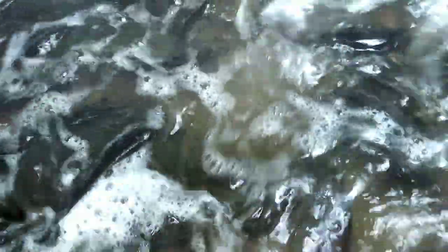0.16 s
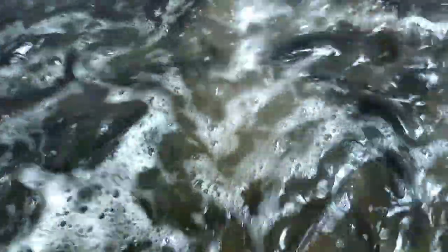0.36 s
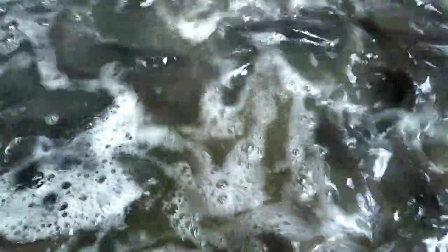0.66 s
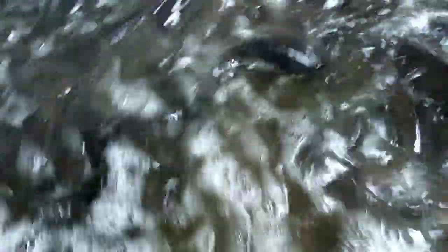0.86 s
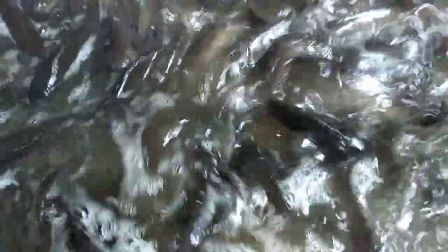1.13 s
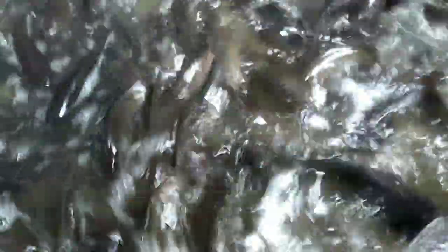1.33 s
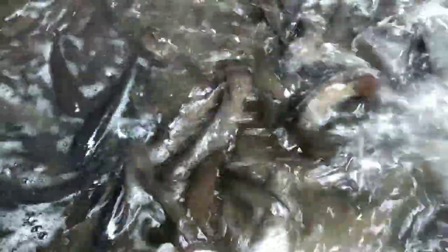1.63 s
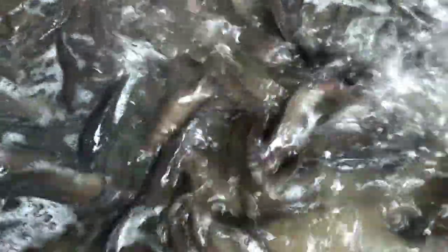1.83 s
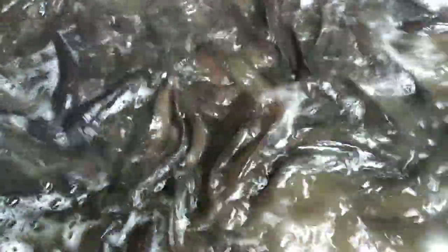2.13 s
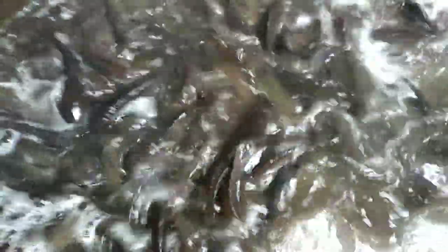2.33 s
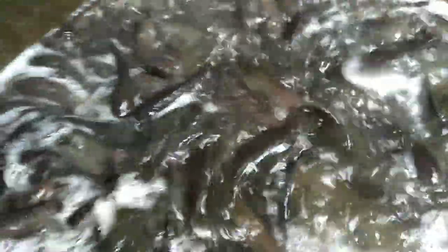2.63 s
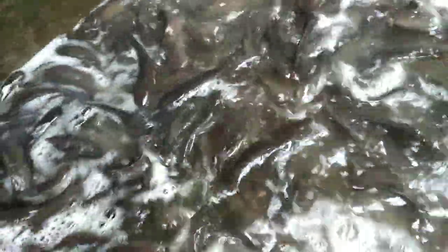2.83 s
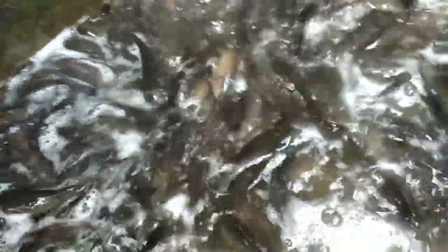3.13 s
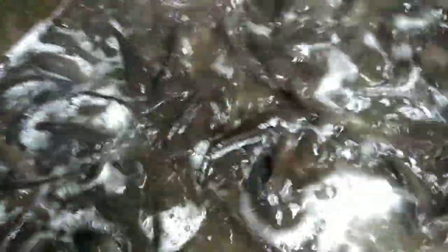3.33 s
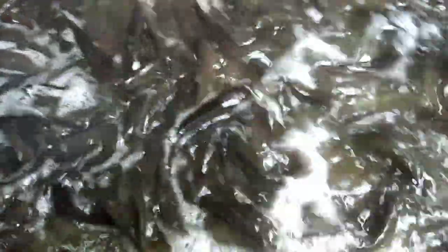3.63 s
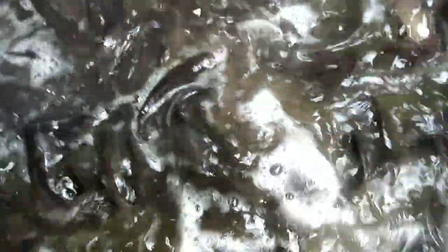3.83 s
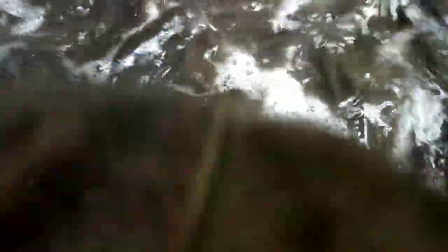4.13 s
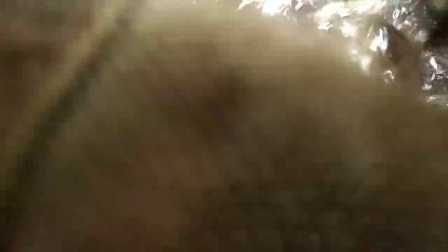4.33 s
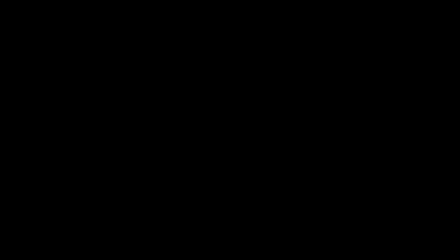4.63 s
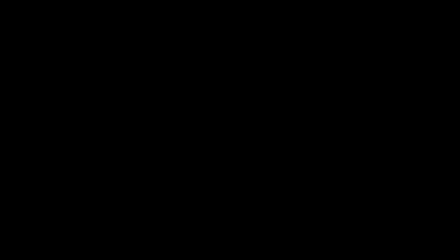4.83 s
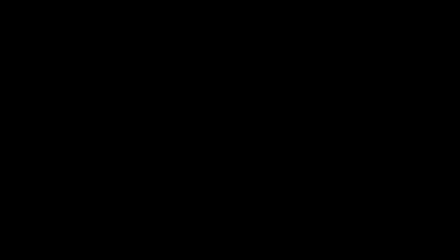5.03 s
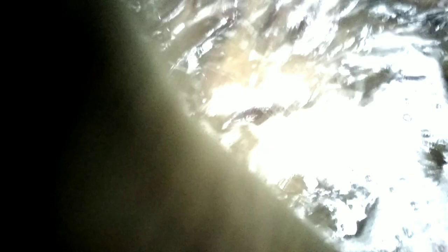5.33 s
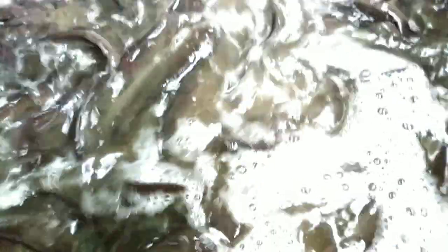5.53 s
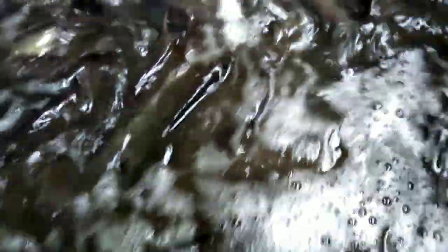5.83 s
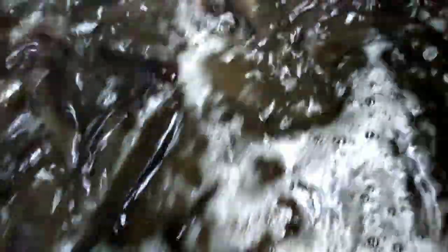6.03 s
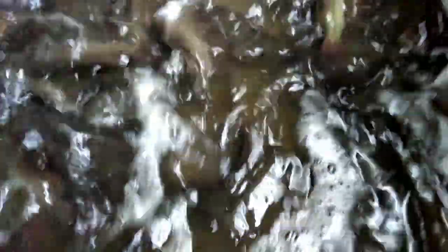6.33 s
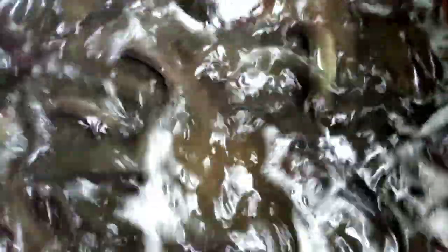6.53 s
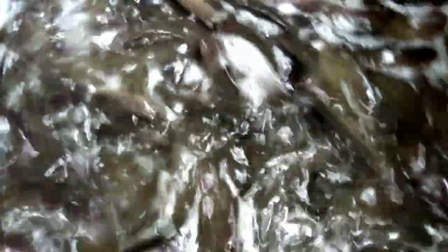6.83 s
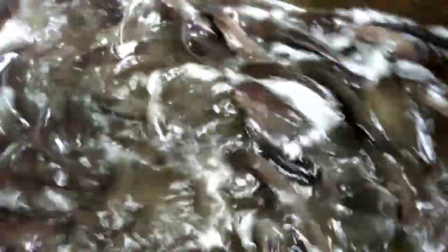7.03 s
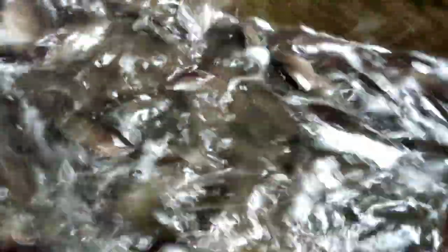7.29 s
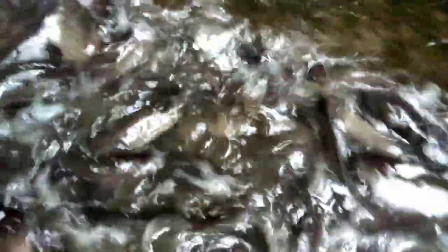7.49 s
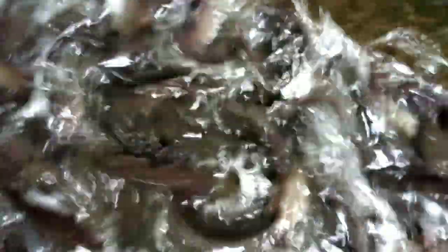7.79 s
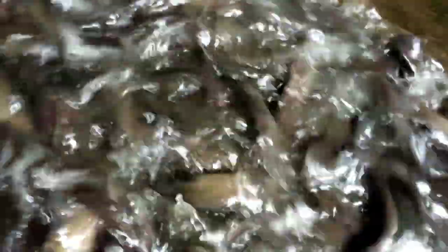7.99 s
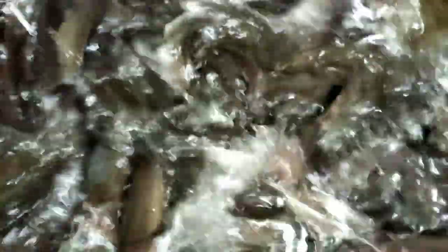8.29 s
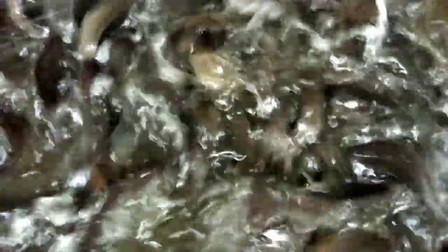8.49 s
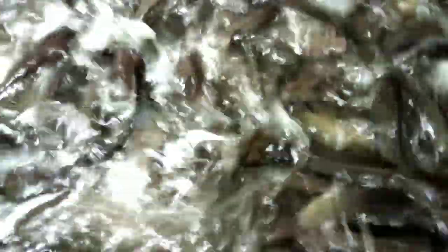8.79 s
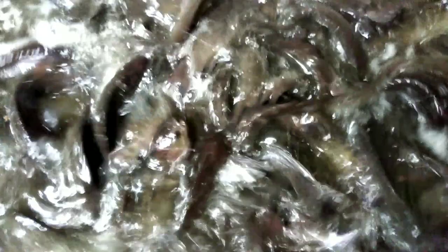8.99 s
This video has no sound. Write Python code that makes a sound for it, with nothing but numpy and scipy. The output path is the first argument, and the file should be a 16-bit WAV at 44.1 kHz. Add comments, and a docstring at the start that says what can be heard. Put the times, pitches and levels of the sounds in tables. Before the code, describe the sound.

Crowded fish thrash at a water surface, with close splashes, bubbly plops and slaps, a brief hand bump, then a dense churning rush of water.

```python
"""At the surface of a tank, crowded fish thrash close to two hand-held microphones.
Tail slaps throw hissing spray (shaped noise) and trap air that rings as rising bubbles (swept sines).
Swarms of small bubbles make the churning, smacks are short pips, and body blows are low noise puffs.
Late on the whole shoal churns into one rush. Tank walls scatter the sound by sparse echoes.
A low noise rumble lies beneath, and a hand brushes and ticks on the microphones for a second."""
import sys
import numpy as np
from scipy import signal
from scipy.fft import rfft, irfft, next_fast_len
from scipy.io import wavfile
from scipy.ndimage import uniform_filter1d

SR = 44100
rng = np.random.default_rng(int(sys.argv[2]) if len(sys.argv) > 2 else 0)


def waveform_to_disk(signal):
    """Save audio, clipped to [-1, 1], as 16-bit WAV at the path in sys.argv[1]."""
    frames = np.transpose(np.atleast_2d(signal))
    scaled = np.clip(frames, -1, 1) * 32767
    samples = np.round(scaled).astype(np.int16)
    wavfile.write(sys.argv[1], SR, samples)


N = 403515  # samples


def amp(db):
    """Decibel law: level to amplitude ratio; a doubled level gives the power ratio."""
    return 10 ** (np.asarray(db) / 20)


def evened(x):
    """Normalisation to unit root-mean-square."""
    return x / np.sqrt(np.mean(x ** 2) + 1e-20)


def read(points, hz):
    """Interpolation of a spectrum along a logarithmic frequency axis."""
    f, value = np.transpose(points)
    return np.interp(np.log(hz + 1), np.log(f + 1), value)


def sides(pan_db):
    """Level difference between the microphones: two gains of mean power 1, positive to the left."""
    share = 1 / (1 + amp(-2 * np.asarray(pan_db)))
    return np.sqrt(2 * np.array([share, 1 - share]))


def add(mix, s, sound):
    """Superposition: a sound joins the mix at its start time."""
    part = mix[..., max(round(s * SR), 0):][..., :sound.shape[-1]]
    part += sound[..., :part.shape[-1]]


def highpass(x, hz):
    """Second-order removal of the bass."""
    return signal.sosfilt(signal.butter(2, hz, "high", fs=SR, output="sos"), x)


def hiss(spectrum, patchy_db, same):
    """Coloured noise: random short-time spectra with small drifting patches and a set coherence."""
    frames, hz = N // 256 + 5, np.fft.rfftfreq(1024, 1 / SR)
    a, b, c, d, patches = rng.standard_normal((frames, 513, 5)).T
    patches = uniform_filter1d(patches, size=9, axis=0)
    patches = evened(uniform_filter1d(patches, size=4, axis=1))
    same, left = np.clip(same, 0, 1), a + 1j * b
    right = same * left + np.sqrt(1 - same ** 2) * (c + 1j * d)
    z = np.array([left, right])
    z *= amp(read(spectrum, hz)[:, None] + patchy_db * patches)
    return evened(signal.istft(z, nperseg=1024, noverlap=768)[1][:, :N])


def bubble(hz, length, lead=0., rise=4.3, start=0.043):
    """Bubble resonance: trapped air rings, and its pitch climbs as it nears the surface."""
    # length and lead in s, rise as a fraction of hz per s, start as a fraction of length
    t = np.arange(0, 2 * length, 1 / SR)
    swell = (1 - np.exp(-t / (start * length))) ** 2
    shape = swell * np.exp(-(t / (0.98 * length)) ** 2)
    t = t + np.array([[lead / 2], [-lead / 2]]) - length / 2
    return shape / shape.max() * np.sqrt(2) * np.sin(2 * np.pi * hz * (t + rise * t ** 2 / 2))


def swarm(pitches, lean_db, calm, cycles, per_s, spread_db, clump_db):
    """Random superposition: small bubbles from many directions, neighbouring sizes in clumps."""
    # lean_db per octave favours small or large bubbles
    out, clumps = np.zeros((2, N)), rng.standard_normal((N // 256 + 2, len(pitches))).T
    clumps = uniform_filter1d(clumps, size=8, axis=0) ** 2
    clumps = signal.lfilter([1], [1, -.8], clumps)  # sudden start, slower fade
    clumps = evened(np.log(clumps) - np.log(clumps).mean())
    for (hz, db), clump in zip(pitches, clumps):
        at = np.flatnonzero(rng.random(N - 100) < per_s / len(pitches) / SR) + 50
        big, way = rng.random((N // 50, 2))[:len(at)].T
        chance_db = spread_db * np.minimum(-np.log(1 - big), 4) + clump_db * clump[at // 256]
        octaves = np.log2(hz / 1600)
        size = amp(db + calm[at] * chance_db + lean_db[at] * octaves + 10.0 * (1 - calm[at]))
        lead = np.round(min(.0007, hz / 2700000.0) * (way - .5) * SR).astype(int)
        train = np.zeros((2, N))
        train[[[0], [1]], [at - lead, at + lead]] = size * sides(6 * (way - .5))
        out += signal.oaconvolve(train, bubble(hz, cycles / hz, rise=hz / 150), axes=1)[:, :N]
    return evened(out)


# How hard the shoal churns: time_s, gurgle_db, common_pitch_hz (sets the lean to small or large),
# gulps_db (deep, against the gurgle), fizz_db
CHURNING = [(0.0, -23, 1230, -9, -24.5), (0.06, -34, 1510, -24, -37.5), (0.43, -36, 2300, -19, -37),
            (0.48, -32, 1730, -18, -42.5), (1.76, -33, 1670, -30, -33.5), (2.11, -37.5, 1800, -22, -47.5),
            (2.34, -36.5, 1930, -17, -48), (2.66, -42, 1910, -19.5, -46.5), (3.56, -36.5, 1550, -30, -44.5),
            (4.25, -31, 2100, -32, -38), (4.36, -37.5, 1740, -37, -40.5), (6.2, -43.5, 2110, -28, -50),
            (6.34, -38.5, 2230, -11, -40), (6.39, -22, 1280, -39, -41.5), (6.445, -34, 1100, -16, -37.5),
            (6.5, -24, 1160, -22, -29), (6.6, -22, 1390, -5, -30.5), (7.24, -26, 1680, -13.5, -25.5),
            (7.77, -22.5, 1590, -15.5, -24.5), (8.71, -25, 1910, -17.5, -23.5),
            (9.05, -27.5, 1640, -19, -32), (9.15, -35.5, 2100, -21, -36.5)]
# Gurgle bubbles by size: pitch_hz, level_db
GURGLE_SIZES = [(430, -27.5), (700, -6.5), (1300, 4), (2000, 10), (2800, 5.5), (4200, 2)]
# Spectrum of fine spray: frequency_hz, level_db
MIST_SPECTRUM = [(2500, -24), (4600, -10.5), (6000, -7.5), (7500, -1.5), (9700, -3.5), (12000, -7.5),
                 (14500, -13), (16000, -14)]


def shoal():
    """Summed bubble resonance: the common churning of gurgle, gulps, pattering drops and fizz."""
    t = np.arange(N) / SR
    s, *columns = np.transpose(CHURNING)
    gurgle_db, common_hz, gulp_db, fizz_db = (np.interp(t, s, c) for c in columns)
    calm = np.clip((-13.5 - fizz_db) / 26, .62, 1)  # chance evens out when all fish beat at once
    surge = uniform_filter1d(rng.standard_normal(N), size=1200)
    surge = evened(uniform_filter1d(surge, size=1200)) * calm ** 3

    hz = np.geomspace(430, 4400, num=60)
    lean_db = 12.8 * np.log2(common_hz / 1700)
    gurgle = swarm(list(zip(hz, read(GURGLE_SIZES, hz))), lean_db, calm,
                   cycles=10.86, per_s=1600, spread_db=2.5, clump_db=5.0)
    hz = np.geomspace(240, 620, num=16)
    gulps = swarm(list(zip(hz, 13.0 * np.log2(hz / 700))), np.zeros(N), calm,
                  cycles=4.66, per_s=390, spread_db=6.0, clump_db=1.5)

    spray = hiss(MIST_SPECTRUM, patchy_db=4.0, same=0) + amp(-3.0) * patter(calm)
    hz = np.geomspace(4600, 15000, num=16)
    fizz = swarm(list(zip(hz, read(MIST_SPECTRUM, hz))), np.zeros(N), calm,
                 cycles=5.8, per_s=1400, spread_db=6.5, clump_db=-3.0)
    spray += amp(-3.5) * fizz
    churn = np.sqrt(amp(2 * gurgle_db) + wakes()) * (gurgle + amp(gulp_db) * gulps)
    return churn + amp(fizz_db + 3.6 * surge) * spray


# Spectrum of drops: frequency_hz, level_db
DROP_SPECTRUM = [(500, -48), (1500, -7.5), (2500, -5), (4000, -5.5), (4800, -12.5), (7000, -10)]


def patter(calm):
    """Drop impact as brief resonance: falling drops make dense tiny plinks."""
    hz = np.geomspace(900, 6500, num=24)
    return swarm(list(zip(hz, read(DROP_SPECTRUM, hz))), np.full(N, 6.), calm,
                 cycles=11.94, per_s=4000, spread_db=2.5, clump_db=3.0)


# Loud bubbles: start_s, pitch_hz, level_db, length_ms, left_right_db
LOUD_BUBBLES = [(0.003, 496, -31.5, 42, -6), (0.129, 617, -31, 11.4, 6), (0.138, 1390, -30.5, 30, 5),
                (0.203, 615, -30.5, 17, -3), (0.282, 525, -27, 26, -4), (0.296, 2080, -28.5, 40, 3),
                (0.316, 661, -26.5, 46, 2), (0.397, 706, -33, 18.5, -2), (0.503, 1450, -21.5, 17.6, 9),
                (0.593, 1460, -27, 17.4, 6), (0.663, 1690, -18.5, 14.4, -8), (0.677, 485, -29, 11.5, 2),
                (0.694, 1947, -24, 30, 5), (0.766, 2260, -22, 8.6, 5), (0.821, 1020, -23.5, 23.5, 10),
                (0.901, 604, -21.5, 11.2, 1), (0.951, 343, -25, 26, 3), (1.056, 1317, -18, 8.8, 3),
                (1.319, 980, -31, 8.4, 2), (1.342, 1192, -30, 26, 5), (1.444, 1730, -19.5, 9.5, 1),
                (1.637, 985, -32, 39, 8), (1.7, 615, -27.5, 13.8, 7), (1.805, 2266, -29, 24, 17),
                (1.808, 1060, -29, 26, 4), (2.172, 1057, -35, 23, 4), (2.255, 1306, -35.5, 21, 10),
                (2.356, 1330, -28, 14, 11), (2.438, 595, -29.5, 10.2, 11), (2.529, 940, -34, 26, -3),
                (2.69, 2140, -32.5, 10.6, 3), (3.06, 928, -27, 22, -2), (3.071, 2000, -24, 17, -6),
                (3.074, 2420, -25, 10, 15), (3.211, 1210, -21, 7, 3), (3.283, 990, -33, 17, 11),
                (3.645, 610, -32, 33, -22), (3.738, 1427, -20.5, 23, -14), (3.84, 534, -32.5, 25, 12),
                (4.102, 1530, -24.5, 29, -9), (4.271, 2080, -33, 6.4, 24), (4.329, 1840, -26, 13, 8),
                (4.436, 1354, -31.5, 15, 3), (4.538, 1990, -22.5, 8.2, 13), (4.626, 885, -24.5, 12, 16),
                (4.651, 1935, -18, 16.6, -12), (4.79, 1890, -23, 6.9, 32), (4.914, 2940, -29, 12, 3),
                (5.245, 2114, -26, 11, 20), (5.425, 1780, -23.5, 15.4, 26), (5.567, 1820, -28, 10, 47),
                (5.636, 1720, -34, 8, 4), (5.722, 620, -36, 27.5, -2), (5.785, 1834, -30, 14, 28),
                (5.925, 935, -36, 10, 2), (6.126, 1150, -36.5, 13, 5), (6.143, 1480, -31.5, 13, 20),
                (6.396, 1173, -20, 11.8, 0), (6.478, 420, -29, 24, 1), (6.506, 784, -22.5, 12, 6),
                (6.533, 1430, -24, 12, 4), (6.565, 1260, -19, 8.2, 5), (6.622, 686, -19.5, 14.5, 1),
                (6.743, 980, -17, 8.8, -4), (7.224, 561, -25, 25, -8.5), (7.414, 1223, -22, 16, 0.5),
                (8.121, 1190, -21.5, 20, -9.5), (8.381, 840, -18, 9, -9.5), (8.739, 1480, -28, 17.7, -8)]
# The surface snaps shut over each loud bubble: level against it, fading time
SNAP_DB, SNAP_S = 1.5, 0.00079


def bubbles():
    """Size and resonance: deep air pockets glide cleanly, small ones break into blips of nearby pitch."""
    out = np.zeros((2, N))
    for s, hz, db, ms, pan_db in LOUD_BUBBLES:
        side, deep = sides(pan_db)[:, None], min(950 / hz, 1)
        lead = -.00002 * pan_db  # the paths to the microphones differ
        ring = bubble(hz, ms / 1000, lead, rise=4.67 * deep ** 2)
        ragged = evened(uniform_filter1d(rng.standard_normal(8820), size=110))
        ragged = np.tanh(ragged)[:ring.shape[1]]
        add(out, s, amp(db) * ring * (1 + 2.3 * (1 - deep) * min(ms / 25, 1) * ragged) * side)

        snap = rng.standard_normal(600) * np.exp(-np.arange(600) / SR / SNAP_S)
        snap = signal.lfilter(*signal.butter(1, [hz / 2, hz * 2], "band", fs=SR), snap)
        add(out, s, amp(db + SNAP_DB) * snap * np.sqrt(4000 / hz) * side)

        for a, b, c in rng.random((8, 3)):
            small_hz = hz * np.exp(0.58 * (a - .45))
            blip = bubble(small_hz, (3.03 + 3.82 * c) / small_hz, 0.00064 * (c - .5))
            blip_db = db - 12.5 * b - 7.4 * deep  # later blips are weaker
            add(out, s + (0.017 + 1.2 * ms / 1000) * b, amp(blip_db) * blip * side)
    return out


# Drops and fin tips smack the surface: start_s, level_db, pitch_hz
SURFACE_SMACKS = [(0.297, -19, 2080), (0.396, -10, 2320), (0.507, -14, 1470), (0.668, -11, 1610),
                  (0.754, -17, 1260), (0.817, -25, 1010), (1.159, -15, 1130), (1.325, -32, 2500),
                  (1.445, -12, 2570), (1.546, -19.5, 2100), (1.597, -18, 2130), (1.627, -14, 2150),
                  (1.677, -13, 3500), (2.32, -21.5, 3300), (2.359, -25, 1460), (2.693, -19, 2190),
                  (3.087, -18, 1610), (3.163, -18.5, 1900), (3.278, -21.5, 1980), (3.789, -20, 1620),
                  (4.016, -17.5, 2470), (4.105, -17, 2100), (4.119, -15.5, 1510), (4.142, -20, 2240),
                  (4.273, -16, 1980), (4.369, -12.5, 3380), (4.527, -20, 2200), (4.677, -15.5, 1940),
                  (4.694, -21.5, 1210), (5.542, -17.5, 1860), (5.7, -17.5, 2120), (5.891, -17, 2080),
                  (5.924, -22, 2700), (8.764, -10.5, 1030)]
SMACK_CYCLES = 3.3  # the pip is strongest after half of these
SMACK_WAKE_DB, SMACK_LEFT_DB = -8, 13.5


def smacks():
    """Impact transient: a crisp pip of a few cycles, then small bubbles of nearby pitch pop."""
    out = np.zeros((2, N))
    draws = rng.random((len(SURFACE_SMACKS), 8, 3))
    for (s, db, hz), rows in zip(SURFACE_SMACKS, draws):
        turns = np.arange(600) / SR * hz
        shape = turns * np.exp(1 - turns) ** (2 / SMACK_CYCLES)
        pip = np.sin(2 * np.pi * turns * (1 + 0.012 * turns)) * shape
        add(out, s, amp(db) * pip / abs(pip).max() * sides(SMACK_LEFT_DB)[:, None])
        for a, b, c in rows:
            small_hz = hz * np.exp(0.44 * (a - .45))
            pop = bubble(small_hz, 7.33 / small_hz, 0.00059 * (c - .5))
            add(out, s + 0.035 * b, amp(db - 13.5 - 10.5 * b) * pop)
    return out


# Each loud bubble or smack stirs a wake: level against it, swell and fading times
WAKE_DB, WAKE_RISE_S, WAKE_FADE_S = -7.5, 0.0023, 0.024


def wakes():
    """Impulse response of stirred water: extra gurgle power swells quickly and fades slower."""
    s, db = np.transpose(LOUD_BUBBLES)[[0, 2]]
    kicks, t = np.zeros(N), np.arange(0, .4, 1 / SR)
    np.add.at(kicks, np.round(s * SR).astype(int), amp(2 * (db + WAKE_DB)))
    for at, smack_db in np.array(SURFACE_SMACKS)[:, :2]:
        kicks[round(at * SR)] += amp(2 * (smack_db + WAKE_DB + SMACK_WAKE_DB))
    shape = (1 - np.exp(-t / WAKE_RISE_S)) * np.exp(-t / WAKE_FADE_S)
    return abs(signal.oaconvolve(kicks, shape)[:N])


# Dull blows of a body on the water: start_s, level_db
BODY_SLAPS = [(1.154, -26.5), (1.831, -25.5), (2.437, -28), (3.006, -25.5), (3.652, -21.5), (3.992, -26),
              (6.484, -18), (6.62, -24), (8.028, -27.5), (8.76, -17.5)]
# Band of the thud: low_hz, high_hz
THUD_BAND = (200, 686)


def slaps():
    """Damped impact: a short low noise puff with a hard start, nearly alike at both microphones."""
    out, t = np.zeros((2, N)), np.arange(4000) / SR
    band = signal.butter(1, THUD_BAND, "band", fs=SR, output="sos")
    draws = rng.standard_normal((len(BODY_SLAPS), 3, 4000))
    for (s, db), noise in zip(BODY_SLAPS, draws):
        burst = (noise[0] + 0.093 * noise[1:]) * np.exp(-t / 0.018)  # fading time in s
        puff = signal.sosfilt(band, burst)
        add(out, s, amp(db) * puff / abs(puff).max())
    return out


# Sprays from tail slaps: top_s (strongest moment), level_db, width_ms,
# coarse_db (drops against fine mist), left_right_db
TAIL_SPRAYS = [(0.142, -28.5, 8.2, 3, -12), (0.328, -37.5, 67, 9.5, -2), (0.402, -23, 23, -10, -3),
               (0.447, -29.5, 22, -6, 2), (0.523, -27.5, 29, 6.5, 1), (0.701, -27, 89, 3, -3),
               (0.921, -23.5, 43, -5.5, -0.5), (1.022, -29, 46, -1, 2), (1.105, -34, 140, -4.5, 2.5),
               (1.248, -37.5, 26, 0, 18), (1.334, -24, 15, 1, -5), (1.508, -36, 130, 6.5, 2),
               (1.675, -35.5, 57, 10.5, 4), (1.912, -35, 40, 4, 1), (2.084, -35.5, 43, 3, -1.5),
               (2.214, -31, 17, -2, 5), (2.322, -18, 34, -11, 0), (2.411, -26.5, 60, 1, 1),
               (2.486, -35.5, 84, 1.5, -3), (2.72, -28.5, 31, -19, -1), (3.069, -25, 33, -6.5, -5),
               (3.204, -35.5, 98, 5, -5), (3.67, -31.5, 27, 2.5, 4), (3.855, -31.5, 19, 3, -11),
               (3.889, -29, 25, 5.5, -5), (4.069, -22.5, 27, -47, 6), (4.223, -22.5, 16, -11, 21),
               (4.292, -26.5, 24, -3, 10), (4.367, -22, 14, -14, 10), (4.467, -27.5, 38, -22, 18),
               (4.565, -29, 72, 1, 24), (4.689, -31.5, 51, 3, 5), (4.792, -30, 12, -6, 30),
               (4.95, -27, 14, -4, 15.5), (5.087, -32, 11, -14, 10), (5.215, -25, 26, 1, 5),
               (5.277, -31.5, 34, 3, 9), (5.316, -25.5, 18, -5, 10), (5.402, -23.5, 28, -3.5, -1.5),
               (5.566, -29.5, 50, -6.5, 1), (5.741, -28, 50, -5.5, 3), (5.92, -40.5, 41, 6.5, -2),
               (6.027, -32.5, 36, -2, -2), (6.423, -28.5, 37, -14, 0)]


def sprays():
    """Noise under a power envelope: each slap's mist and drops swell fast and fall slower."""
    mist, drops, t = np.zeros((2, N)), np.zeros((2, N)), np.arange(N) / SR
    for s, db, ms, coarse_db, pan_db in TAIL_SPRAYS:
        near = slice(max(round((s - .2) * SR), 0), round((s + .3) * SR))
        u = (t[near] - s) / ms * 1000
        shape = np.exp(-(u / np.where(u < 0, .3, .66)) ** 2)
        puff = amp(2 * db) * shape * sides(pan_db)[:, None] ** 2
        mist[:, near] += puff
        drops[:, near] += puff * amp(2 * coarse_db)
    fine = hiss(MIST_SPECTRUM, patchy_db=7.0, same=0)
    coarse = hiss(DROP_SPECTRUM, patchy_db=6.0, same=0)
    return np.sqrt(mist) * fine + np.sqrt(drops) * coarse


# Hand on the microphone: start_s, level_db, thud_hz, length_ms, left_right_db
HAND_BRUSHES = [(4.485, -27, 89.5, 9.1, -28), (4.53, -34, 70, 21, -22), (4.599, -26.5, 169, 54, -19),
                (5.167, -28, 150, 13, -13), (5.191, -17, 105, 19, -17), (5.287, -27, 137.4, 89, -22),
                (5.352, -22.5, 163, 30, -35), (5.403, -30.5, 223, 25, -24), (5.422, -21.5, 157, 23, -20)]


def hand():
    """Friction: skin drags on the casing, an uneven low wobble with a scratchy edge."""
    out = np.zeros((2, N))
    for s, db, hz, ms, pan_db in HAND_BRUSHES:
        a, b = rng.standard_normal((4410, 2)).T
        count = round(ms / 1000 * SR)
        uneven_hz = hz * np.exp(3.9 * uniform_filter1d(a, size=200))
        wobble = np.sin(2 * np.pi * np.cumsum(uneven_hz) / SR)
        scratch = evened(signal.lfilter([1], [1, -.93], b))
        drag = (0.67 * wobble + 0.43 * scratch)[:count] * signal.windows.tukey(count, .6)
        add(out, s, amp(db) * drag * sides(pan_db)[:, None])
    return out


# Fingers tick on the casing: start_s, level_db, left_right_db
FINGER_TICKS = [(5.198, -17, 12), (5.407, -13.5, -22), (5.428, -14.5, -21), (5.433, -13, -23)]


def ticks():
    """Pressure pulse: short pushes on the membrane, stronger at one side."""
    out, u = np.zeros((2, N)), np.arange(300) / SR / 0.00016
    for s, db, pan_db in FINGER_TICKS:
        add(out, s, amp(db) * u * (2 - u) * np.exp(1 - u) * sides(pan_db)[:, None])
    return out


def walls(x, t60=0.09):
    """Diffuse scatter from tank walls and moving surface: sparse random-sign taps, four sets in turn."""
    out, turn = np.zeros((2, N)), np.arange(N) / SR * 9  # nine turns per s
    for k in range(4):
        taps = np.zeros((2, 6000))
        at = np.arange(60, 5980, 20) + rng.integers(0, 20, (2, 296))
        decay = amp(-60 * at / SR / t60)
        np.put_along_axis(taps, at, rng.choice([-1., 1.], at.shape) * decay, 1)
        window = np.cos(np.pi * np.clip((turn + k) % 4 - 2, -1, 1) / 2)
        out += signal.oaconvolve(x * window, taps / np.linalg.norm(taps[0]), axes=1)[:, :N]
    return out


# Spectrum of the rumble: frequency_hz, level_db
RUMBLE_SPECTRUM = [(18, -45), (30, -21), (60, -39), (95, 4), (130, -5), (200, -8), (400, -12), (900, -20)]
RUMBLE_DB = -49  # level in still water


def rumble(water):
    """Driven vibration: heavy churning shakes the tank and swells a steady low noise."""
    noise = hiss(RUMBLE_SPECTRUM, patchy_db=1.5, same=.8)
    stir = uniform_filter1d((water ** 2).mean(0), size=9000)
    return np.sqrt(amp(2 * RUMBLE_DB) + amp(-47.0) * abs(stir)) * noise


def scene():
    """Superposition of direct sound, wall scatter, spray, handling and rumble."""
    air = bubbles() + shoal() + slaps() + smacks()
    water = air + amp(-3.0) * walls(air) + sprays()
    water = highpass(water, 130)  # the water sounds keep little bass below 130 Hz
    return water + hand() + ticks() + rumble(water)


# Colour difference of the microphones, left against right: frequency_hz, difference_db
MICROPHONE_TILT = [(200, 0), (700, -1.5), (1500, 3.5), (4400, -1.5), (8000, -3), (12000, 8), (16000, 1)]
EDGE_HZ = 15750  # upper band limit


def record(dry):
    """Frequency response: the microphones differ in colour, lose deep bass and stop at a band limit."""
    size = next_fast_len(N)
    tilt_db = read(MICROPHONE_TILT, np.fft.rfftfreq(size, 1 / SR)) / 2
    heard = irfft(rfft(dry, size) * amp([tilt_db, -tilt_db]), size)[:, :N]
    heard = highpass(heard, 55)
    lowpass = signal.firwin(511, EDGE_HZ, window=("kaiser", 9), fs=SR)
    return signal.oaconvolve(heard, lowpass[None], "same")


dry = scene()
out = record(dry)
waveform_to_disk(out)
```